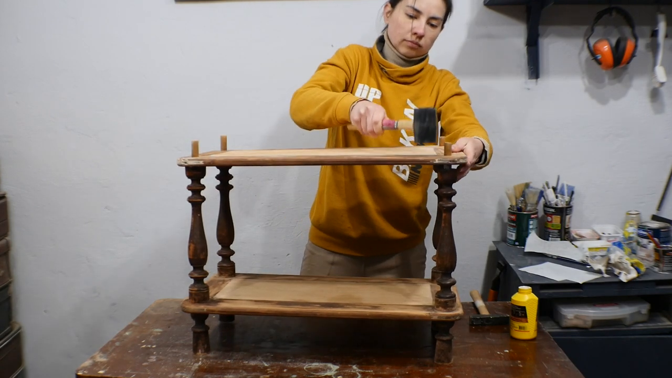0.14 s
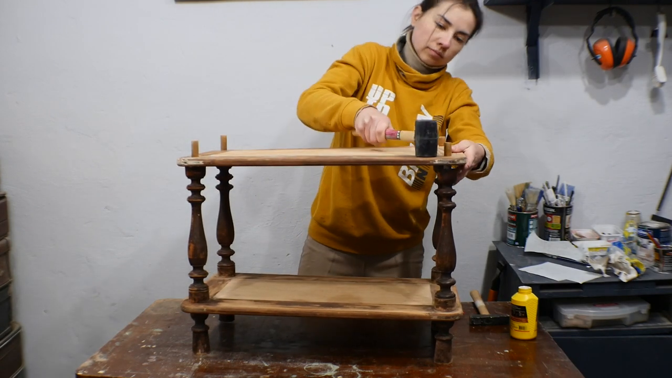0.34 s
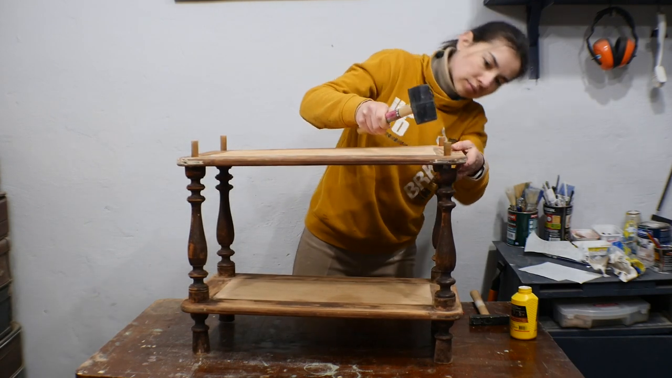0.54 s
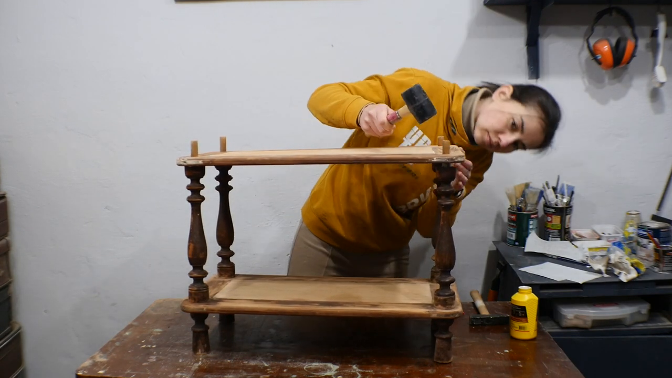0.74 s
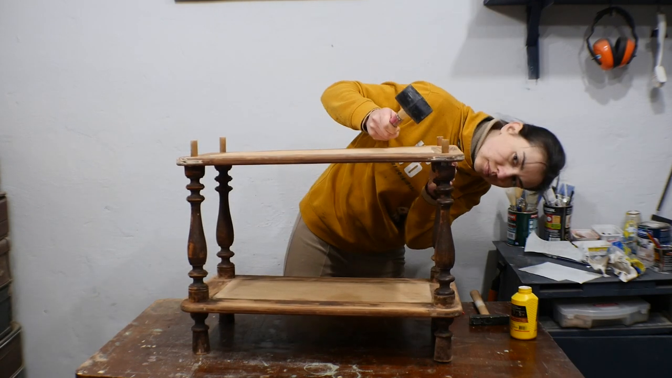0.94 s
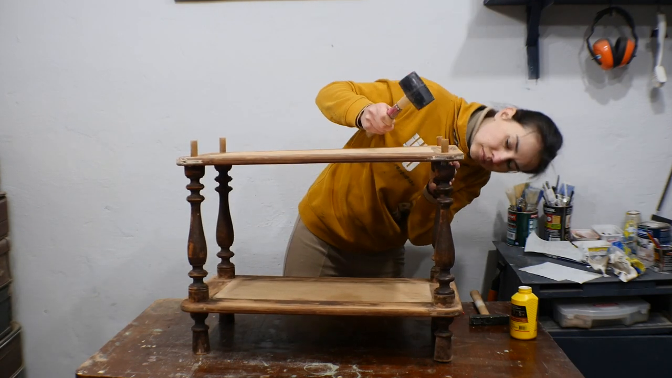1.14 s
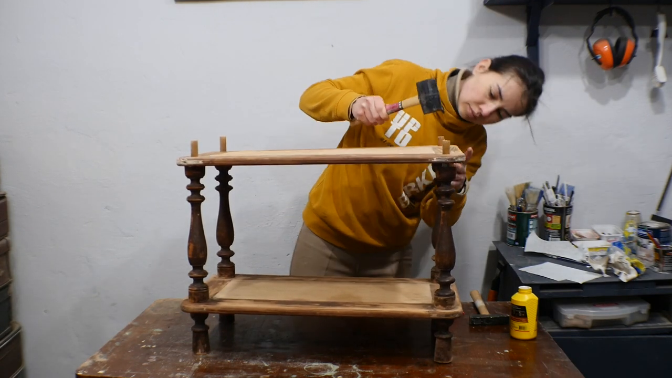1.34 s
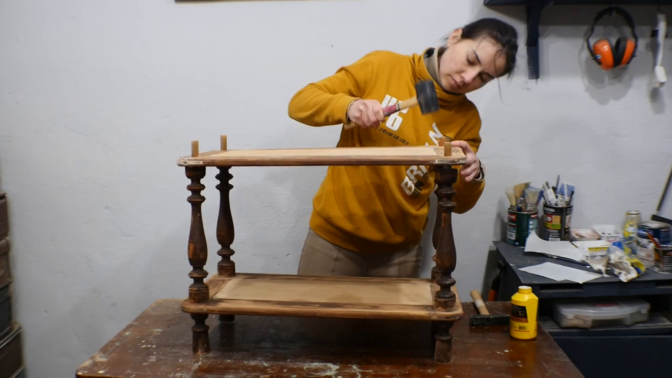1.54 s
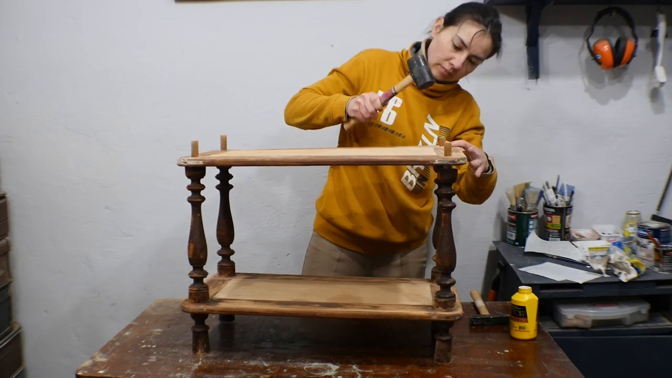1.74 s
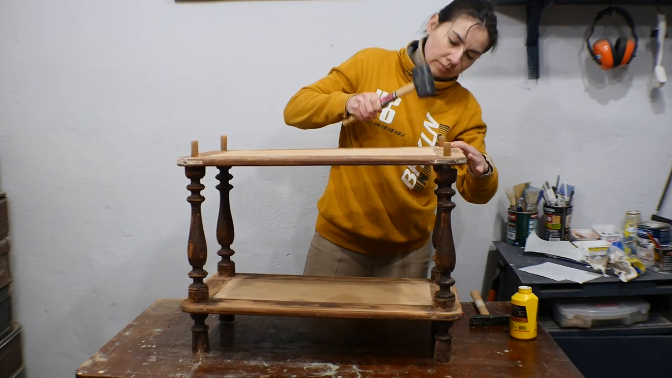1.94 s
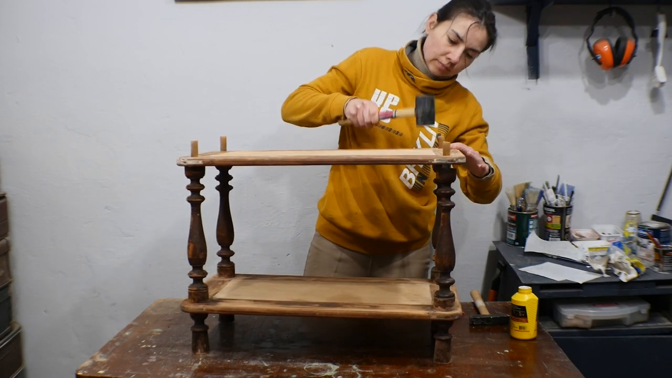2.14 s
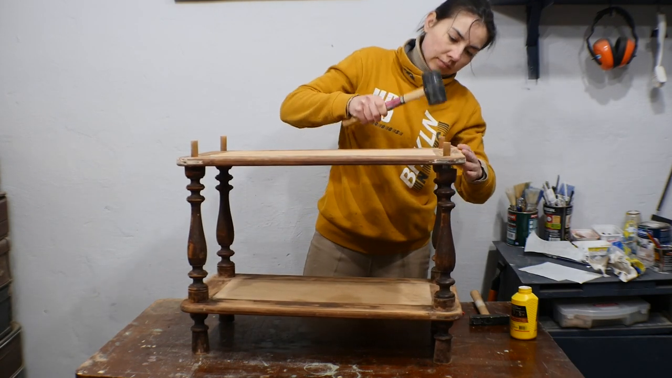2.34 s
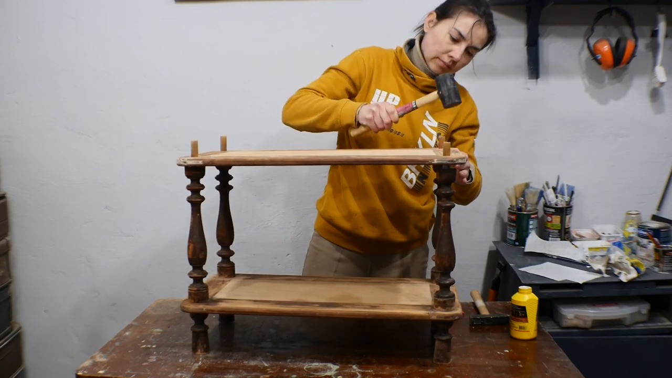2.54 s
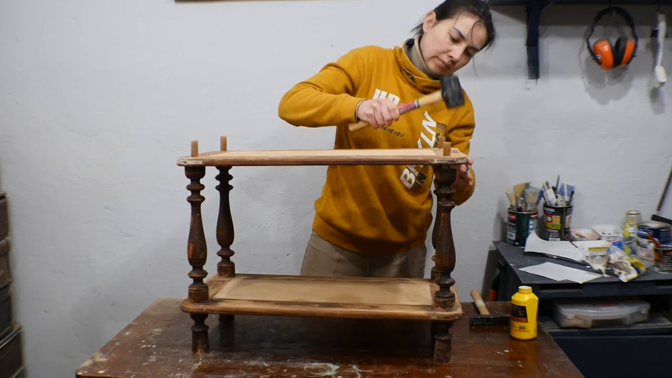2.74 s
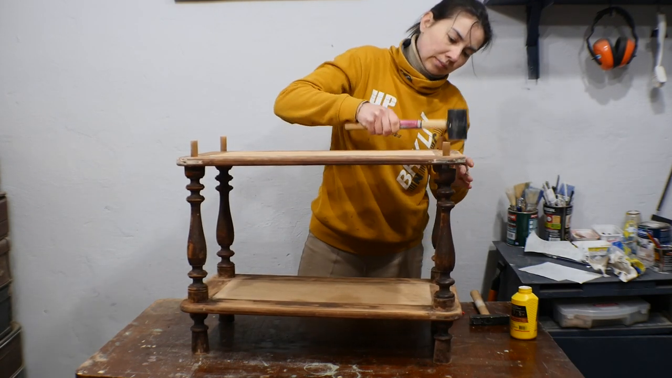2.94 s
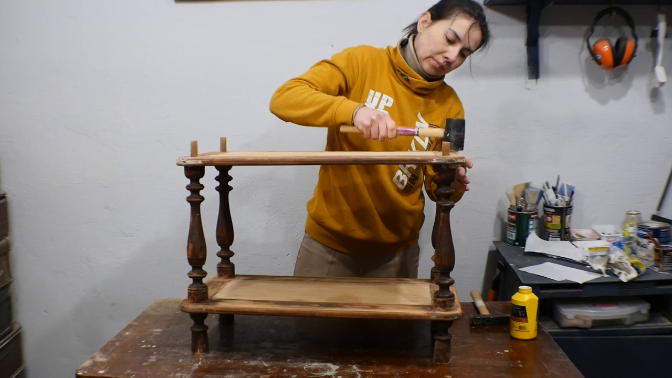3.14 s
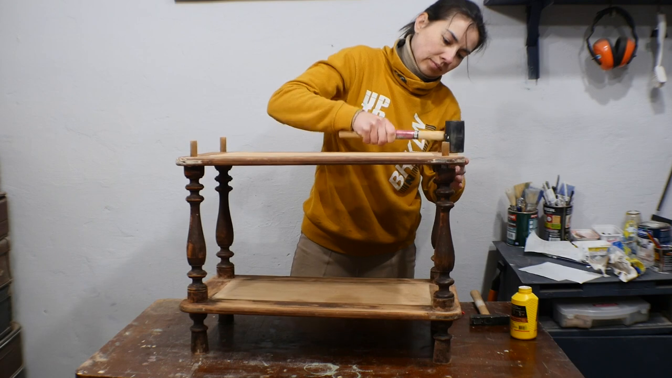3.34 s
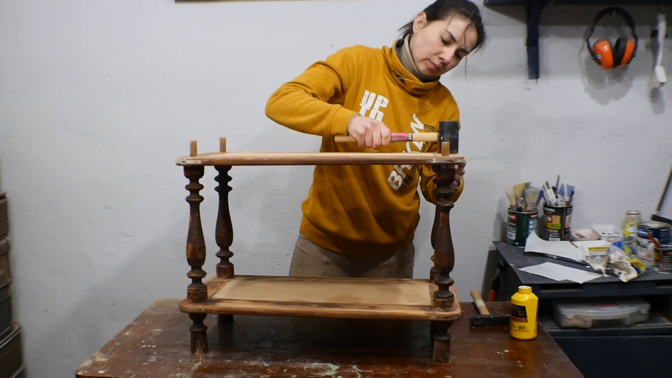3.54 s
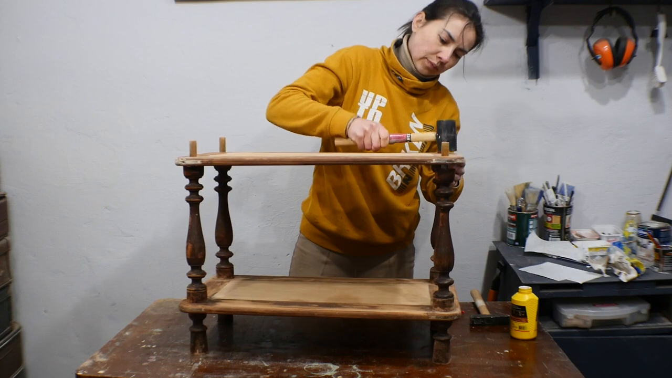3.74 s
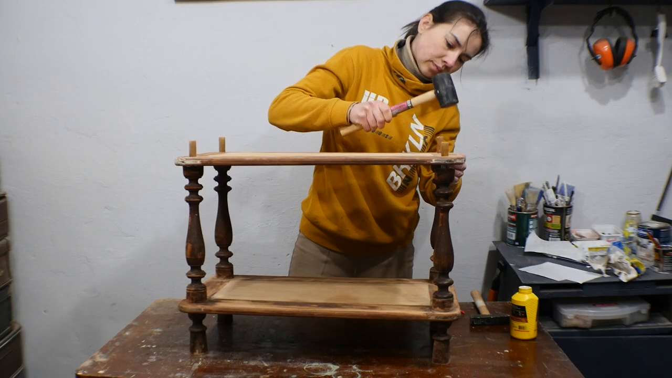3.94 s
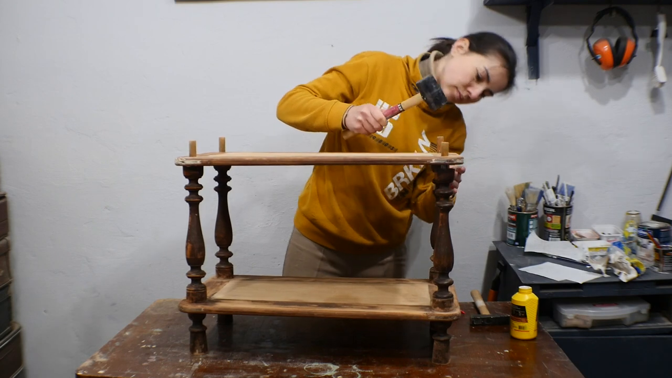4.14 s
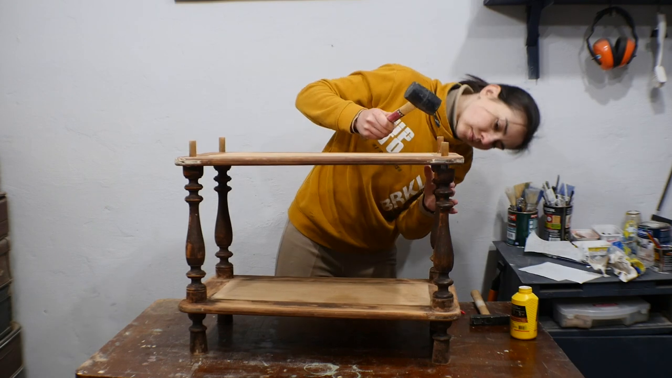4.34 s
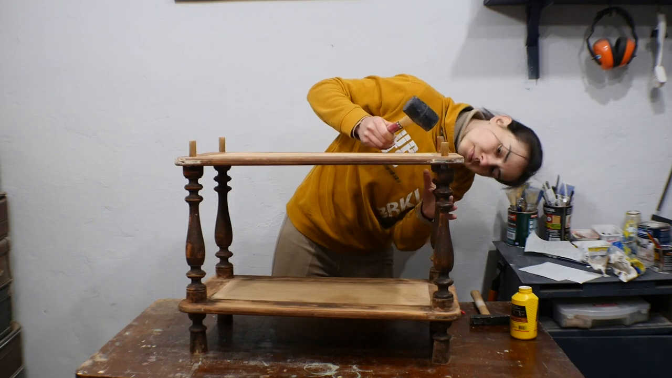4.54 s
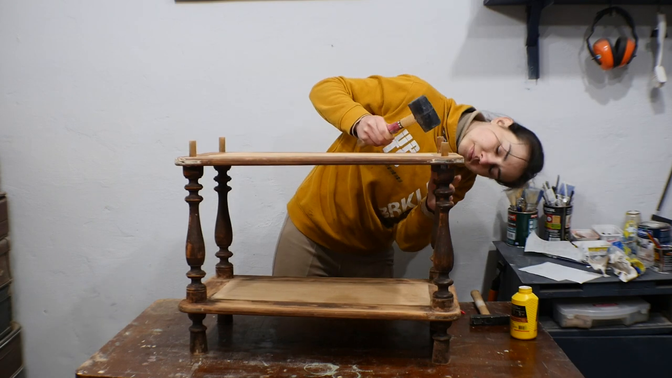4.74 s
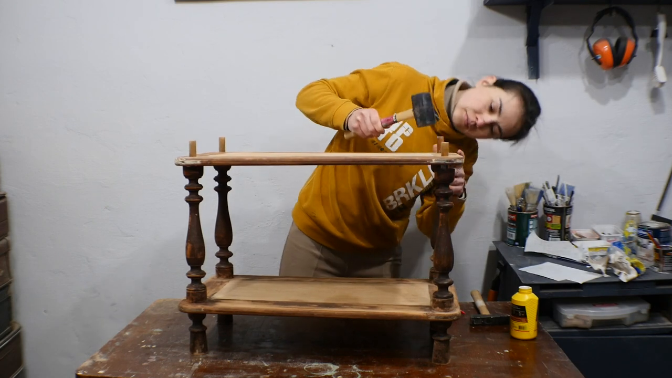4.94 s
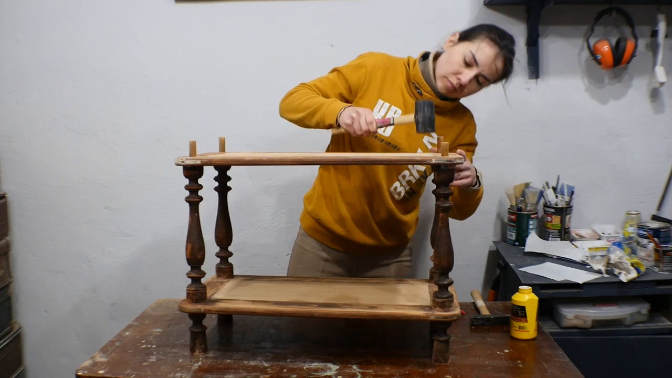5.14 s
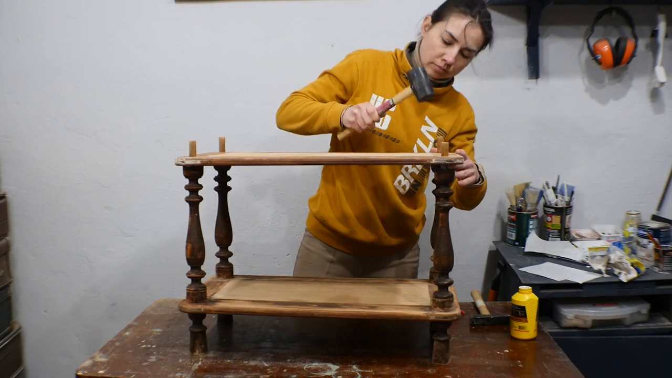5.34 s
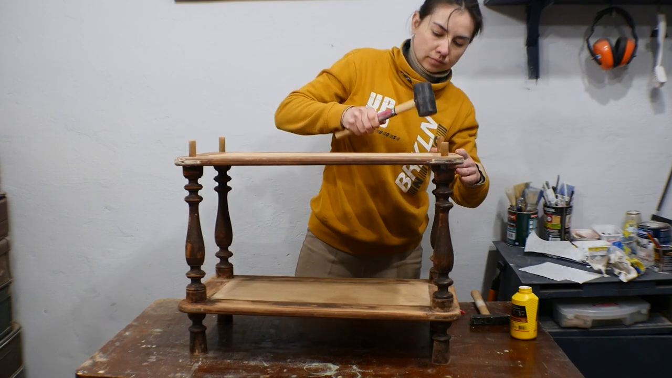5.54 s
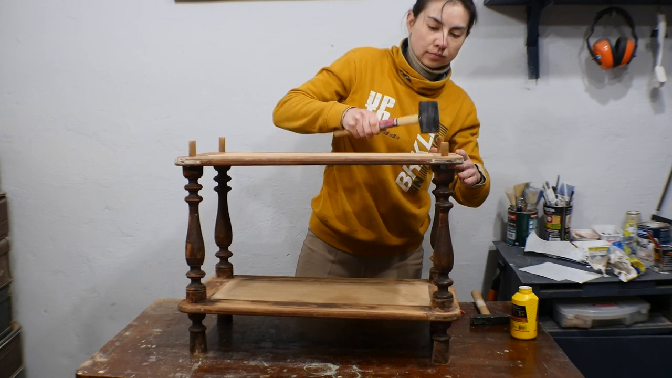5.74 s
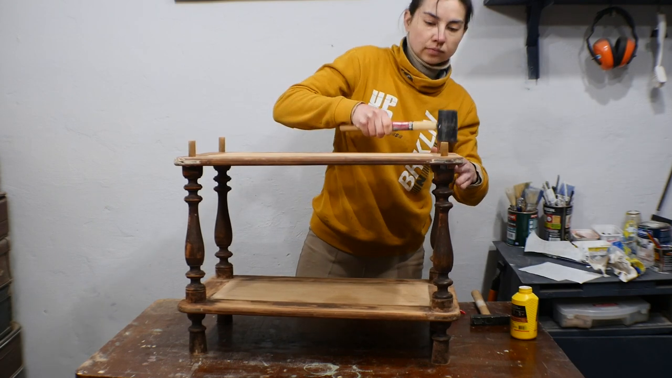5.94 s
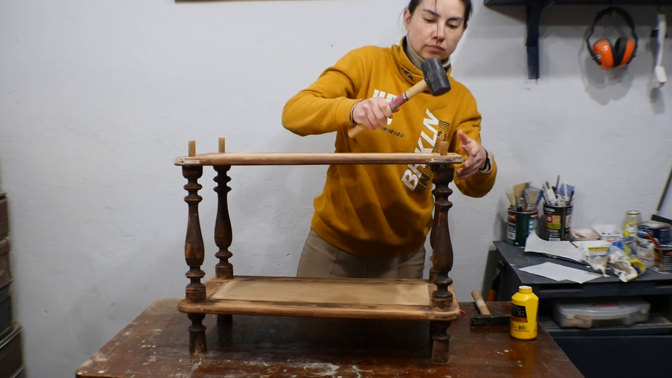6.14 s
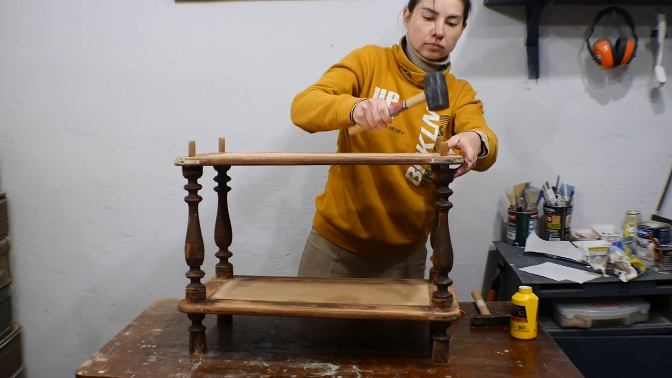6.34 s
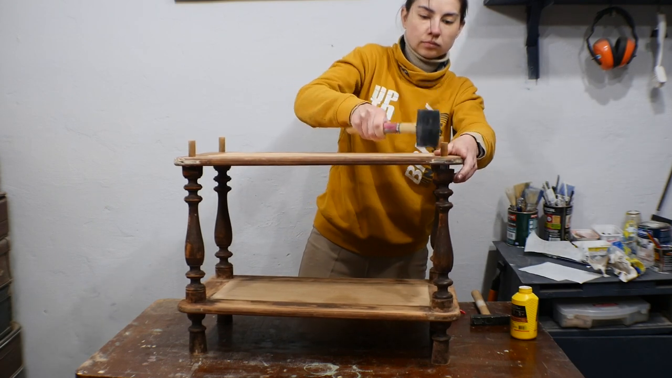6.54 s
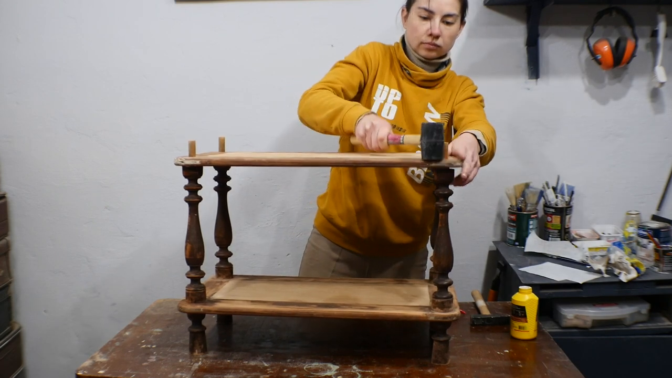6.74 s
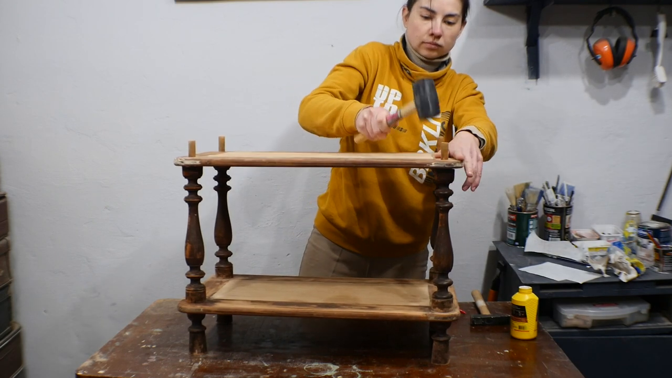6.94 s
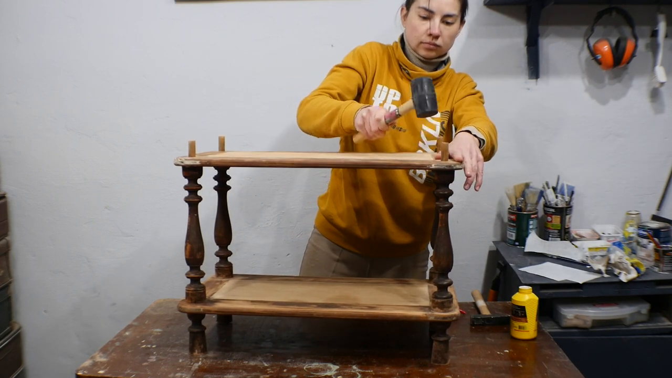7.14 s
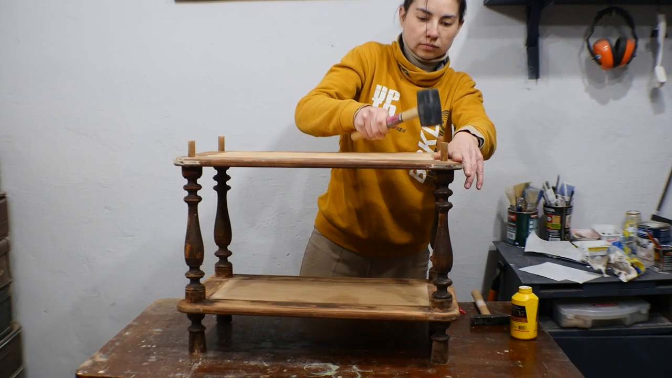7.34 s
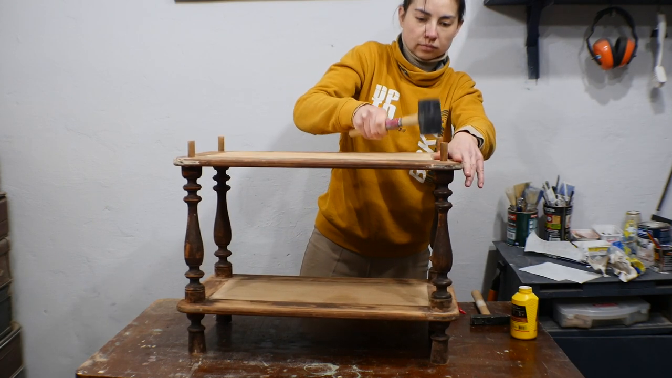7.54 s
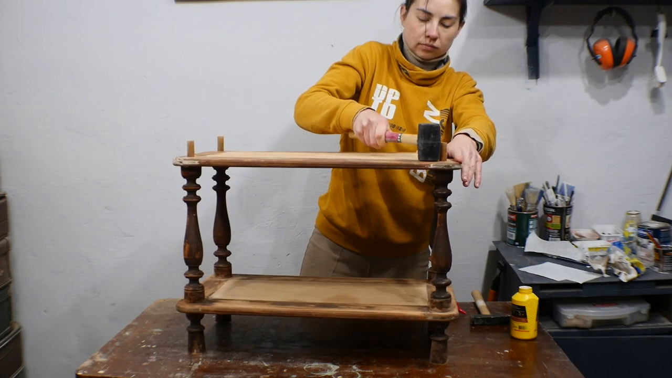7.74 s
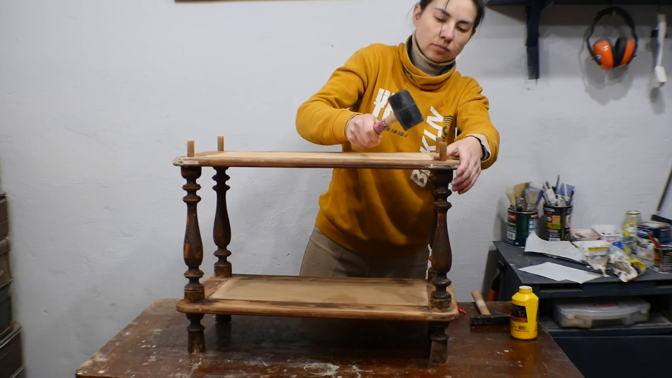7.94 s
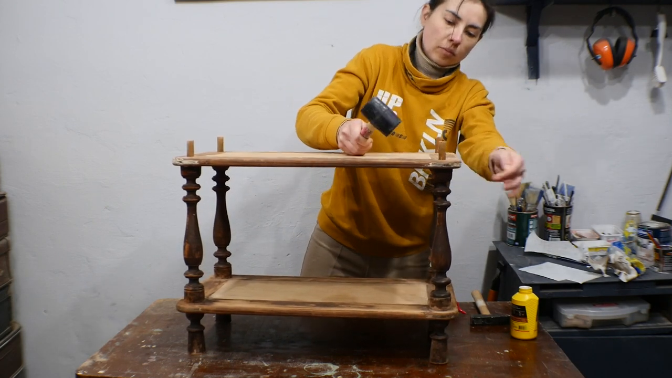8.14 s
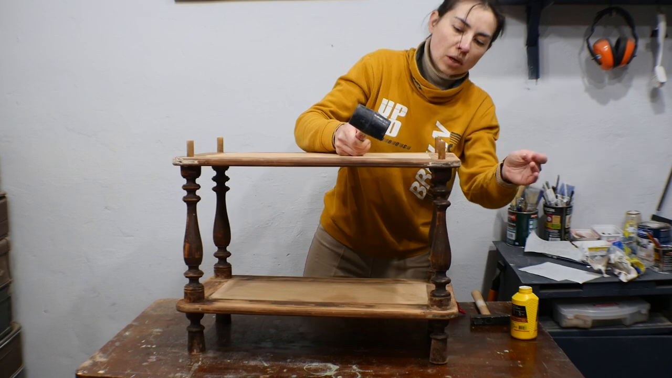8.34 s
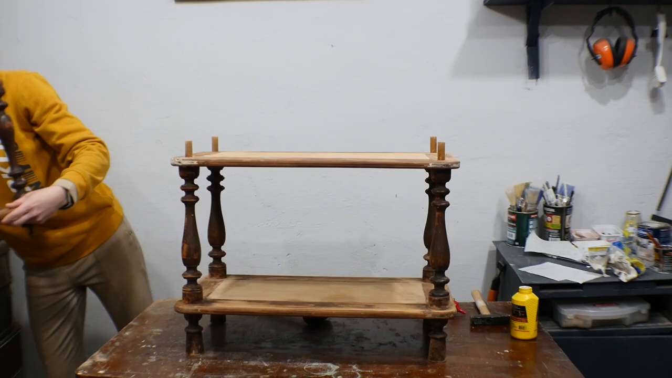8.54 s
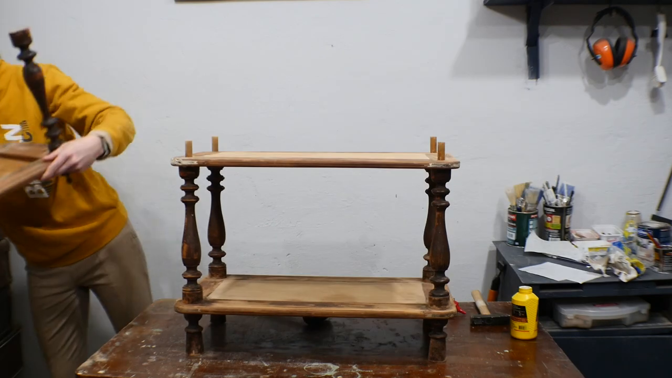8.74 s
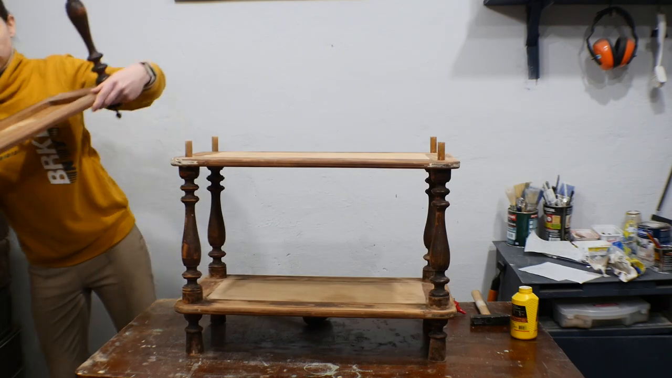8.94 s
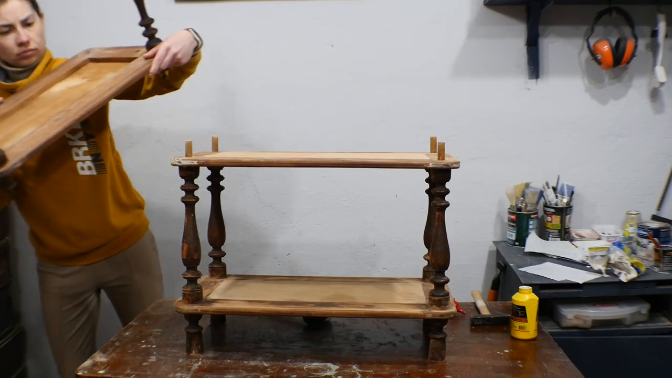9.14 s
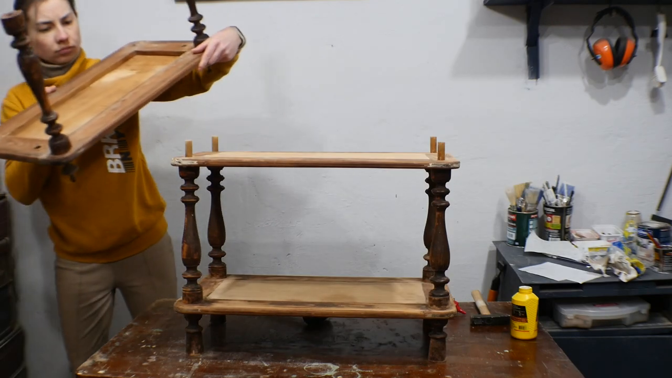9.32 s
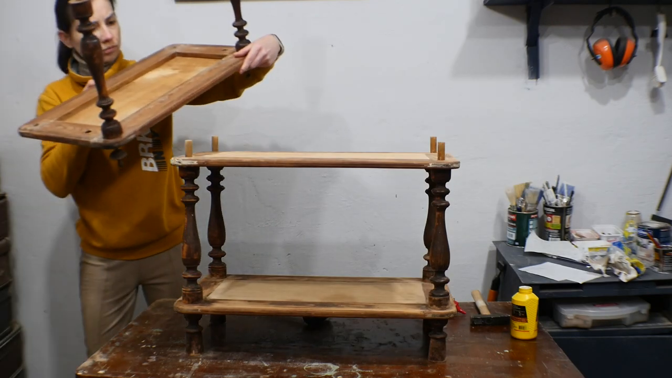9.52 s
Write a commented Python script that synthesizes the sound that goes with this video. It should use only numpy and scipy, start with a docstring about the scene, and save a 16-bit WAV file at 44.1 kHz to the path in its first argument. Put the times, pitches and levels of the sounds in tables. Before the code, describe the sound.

A rubber mallet knocks a wooden shelf down onto its spindles in short runs of quick blows, each a sharp crack with a hollow wooden ring. Between the early runs a loose board is tapped and briefly rattles. Near the end comes a dry click, then the background jumps to a louder hiss with shuffling wood, rustling cloth and soft bumps. The microphone is nearby in a bare, slightly reverberant workshop.

```python
"""A rubber mallet drives a wooden shelf down onto its spindles in short runs of blows, in a bare workshop.
Each impact cracks, knocks the joint and excites the damped modes of the wood; the room reverberates.
Between runs wood shuffles, cloth rustles, a tapped loose board rattles briefly, and there are soft
bumps and dry clicks. Near the end the background steps up abruptly to a louder, sustained hiss, with
shuffling and rustling over it. A limiter compresses the loud blows."""
import sys
import numpy as np
from scipy import signal
from scipy.fft import rfft, irfft
from scipy.io import wavfile
from scipy.ndimage import uniform_filter1d

SR = 44100
rng = np.random.default_rng(int(sys.argv[2]) if len(sys.argv) > 2 else 0)


def generate_wav(signal):
    """Clip the signal to [-1, 1] and save it as 16-bit WAV at the path in sys.argv[1]."""
    frames = np.transpose(np.atleast_2d(signal))
    scaled = np.clip(frames, -1, 1) * 32767
    pcm = np.round(scaled).astype(np.int16)
    wavfile.write(sys.argv[1], SR, pcm)


N = 426883
LEAD = SR // 5  # samples ahead of time zero, so that an earlier blow can ring into the scene


def gain_of(db):
    """Amplitude ratio: a factor of ten for every 20 dB."""
    return 10 ** (np.asarray(db) / 20)


def unit_rms(x):
    """Normalisation to a mean power of one."""
    return x / np.sqrt(np.mean(x ** 2) + 1e-20)


def curve_at(points, hz):
    """Interpolation of (frequency [Hz], value) points on a logarithmic frequency axis."""
    f, value = np.transpose(points)
    return np.interp(np.log(hz + 1), np.log(f + 1), value)


def add(mix, s, sound):
    """Superposition: a sound joins the mix at time s."""
    part = mix[..., LEAD + round(s * SR):][..., :sound.shape[-1]]
    part += sound[..., :part.shape[-1]]


def burst(spectrum, rise, t60, size=4096):
    """Exponential decay of coloured noise after a quick rise; both times in seconds."""
    t = np.arange(size) / SR
    gain = gain_of(curve_at(spectrum, np.fft.rfftfreq(size, 1 / SR)))
    noise = irfft(rfft(rng.standard_normal(size)) * gain)
    return unit_rms(noise) * (1 - np.exp(-t / rise)) * gain_of(-60 * t / t60)


def magnitude(spectrum, size=4096):
    """Two-sided magnitude response of a pulse of unit energy (Parseval's theorem)."""
    return unit_rms(gain_of(curve_at(spectrum, abs(np.fft.fftfreq(size, 1 / SR)))))


def pulse(gain):
    """Minimum phase gives the most compact causal click with this magnitude response."""
    return np.fft.ifft(np.exp(np.conj(signal.hilbert(np.log(gain))))).real


def diffuse_pair(mid, side, hz):
    """Spatial coherence: a diffuse field reaches two microphone ports most alike at long wavelengths."""
    # stereo width: (frequency [Hz], side minus mid level [dB])
    width = [(60, -17), (110, -32), (200, -37), (380, -21), (700, -7), (1290, 0.5), (2380, 1), (4400, 0),
             (8120, -2.5), (15000, -6)]
    side = side * gain_of(curve_at(width, hz))[:, None]
    return np.array([mid + side, mid - side])


def diffuse_noise(spectrum, patchy_db):
    """Random modulation: stereo noise of unit rms whose level drifts in patches of time and frequency."""
    frames, hz = N // 128 + 5, np.fft.rfftfreq(512, 1 / SR)
    mid_re, mid_im, side_re, side_im, patches = rng.standard_normal((frames, 257, 5)).T
    patches = unit_rms(uniform_filter1d(uniform_filter1d(patches, size=8, axis=0), size=16, axis=1))
    spectra = diffuse_pair(mid_re + 1j * mid_im, side_re + 1j * side_im, hz)
    spectra *= gain_of(curve_at(spectrum, hz)[:, None] + patchy_db * patches)
    return unit_rms(signal.istft(spectra, nperseg=512, noverlap=384)[1][:, :N])


def contact_db(hz, hard_db, thump_db):
    """Force spectrum of a contact: a short hard one favours high modes, a flat one moves the bench."""
    return hard_db * np.log2(hz / 500) + thump_db * np.exp(-np.log2(hz / 230) ** 2 / .5)


def impact(modes, crack_spectrum, knock_db, crack_db, db, hard_db, thump_db, tilt_db):
    """Impact excitation: modes ring, the joint knocks, the face cracks. Rows: direct sound, room feed."""
    # dull knock of the joint: (frequency [Hz], spectral level [dB])
    joint = [(60, -28.5), (120, -10), (220, 5), (400, 4), (700, 2), (1200, -1.5), (2000, -12),
             (3500, -25.5), (8000, -40.5)]
    rise_cycles, thud_hz, thud_peak_s = 2.2, 256, 0.0036
    t = np.arange(16384) / SR
    hz, mode_db, t60 = np.array(modes).T[:, :, None]
    spot = rng.standard_normal((len(modes), 2))  # each blow lands on a slightly different spot
    mode_db = mode_db + 2.0 * spot[:, :1] + contact_db(hz, hard_db, thump_db)
    envelopes = gain_of(mode_db - 60 * t / t60) * (1 - np.exp(-t * hz / rise_cycles))
    ring = (envelopes * np.sin(2 * np.pi * hz * (1 + 0.023 * spot[:, 1:]) * t)).sum(0)
    wood = gain_of([[-3.], [-8.]]) * ring
    knock = [(f, level + contact_db(f, hard_db, thump_db)) for f, level in joint]
    crack = [(f, level + tilt_db * np.log2(f / 5000)) for f, level in crack_spectrum]
    wood[0, :4096] += gain_of(knock_db + 11.) * burst(knock, rise=0.0031, t60=0.049)
    thud = (t / thud_peak_s * np.exp(1 - t / thud_peak_s)) ** 2  # first push of the whole bench
    wood[0] += gain_of(2 * thump_db - 0.4) * thud * np.sin(2 * np.pi * thud_hz * t)
    sound = gain_of(db) * wood
    sound[0, :4096] += gain_of(crack_db + 11.5) * burst(crack, rise=0.00066, t60=0.0054)
    room_knock = gain_of(db + knock_db + 29.5) * magnitude(knock)
    room_crack = gain_of(crack_db + 13.0) * magnitude(crack)
    sound[1, :4096] += pulse(np.hypot(room_knock, room_crack))  # incoherent, so their powers add
    return sound


def mallet_blows():
    """Free vibration of the shelf, struck at three spots in turn. Rows: direct sound, three room feeds."""
    # mallet strokes: (time [s], crack level [dB], wood level [dB], hardness [dB/octave],
    # deep thump [dB], crack tilt [dB/octave])
    blows = [(-.11, -21, -18.5, -2.9, -4.4, -3), (.1180, -9.5, -12.5, -1, -5.5, 2.5),
             (.3530, -17.5, -16, -1.5, -7, 0), (1.9011, -9, -12.5, -0.5, -5, 1.5),
             (2.1228, -10.5, -14.5, 0.8, -3.5, 1), (2.7246, -28.5, -22, -3.5, 3.5, 1),
             (2.9381, -7.5, -12.5, 1, 2.5, 0.8), (3.1620, -10.5, -15.5, 1, 3, -2.5),
             (3.3781, -16.5, -19.5, 1.1, 2.5, -2), (3.5869, -19.5, -21, -1.1, -0.5, -1.4),
             (3.8098, -16, -17, 2, 6, .2), (5.4932, -15, -12.5, -2.5, 1.5, 3),
             (5.6990, -22, -14, -1.1, 2.5, 0.5), (5.9190, -21.5, -16.5, 0.3, 6.5, -2.5),
             (6.558, -74, -54.5, -9, 2, -1), (6.8141, -15.5, -17.5, -0.7, -3.5, -0.3),
             (7.0545, -14.5, -17.5, -0.5, -5, -0.5), (7.2847, -20, -14, -1, -7, 0),
             (7.5055, -22.5, -13.5, -0.56, -3, 2.5), (7.7129, -22.5, -16.5, -0.65, -5, 0)]
    # modes of shelf and bench: (frequency [Hz], level [dB], t60 [s])
    shelf_modes = [(104.4, -17, 0.34), (153, -8.5, .2), (218.5, -3.5, 0.26), (252, -6.5, 0.095),
                   (300.7, 1.5, 0.2), (320, -6, 0.11), (425, -3, 0.11), (444.8, -7.5, 0.34),
                   (484.4, 2.5, 0.086), (557, 1.5, 0.15), (634, -1, 0.2), (693.6, 5, 0.057),
                   (813, -0.5, 0.0097), (935, -7.5, 0.065), (1029, -5.5, 0.061), (1273, -9.5, 0.13),
                   (1460, -9.5, 0.007), (1645, -1, 0.031), (1970, -19.5, 0.036), (2360, -19, .03)]
    # slap of the mallet face: (frequency [Hz], spectral level [dB])
    face_crack = [(1000, -2.5), (2000, 0.5), (4000, -1.5), (6500, -5), (10500, -5), (13000, -16),
                  (16000, -31), (19000, -39)]
    out = np.zeros((4, N + LEAD))
    for k, (s, *stroke) in enumerate(blows):
        direct, room_feed = impact(shelf_modes, face_crack, 0, *stroke)
        add(out[0], s, direct)
        add(out[1 + k % 3], s, room_feed)
    return out


def reverberation():
    """Absorption at the walls makes dense reflections of random sign die away, the treble soonest."""
    # reverberation time of the room: (frequency [Hz], t60 [s])
    walls = [(60, 0.61), (200, 0.61), (500, 0.51), (1200, 0.45), (3000, 0.44), (8000, 0.32), (15000, 0.26)]
    onset, spacing = 260, 8  # samples
    reflections = np.zeros((2, SR))
    slots = np.arange(onset, SR - spacing, spacing)
    at = slots + rng.integers(0, spacing, (2, len(slots)))
    np.put_along_axis(reflections, at, rng.choice([-1., 1.], at.shape), 1)
    hz, t, spectra = signal.stft(reflections, SR, nperseg=512)
    decay = gain_of(-60 * t / curve_at(walls, hz)[:, None])
    out = signal.istft(diffuse_pair(*spectra, hz) * decay, SR, nperseg=512)[1]
    return out[:, :SR] * (np.arange(SR) > onset) / np.linalg.norm(out[0])


def workshop(x):
    """Convolution with the room: early echoes for the direct sound, a separate tail for each room feed."""
    # reflections off bench, then walls: (delay [s], level [dB], lag of the left port [samples])
    echoes = [(.0027, -0.5, -0.5), (.0037, -5, 1.5), (.005, -4.5, 4.5), (.008, -7, 0), (0.013, -6, 9),
              (.019, -10, -5.5)]
    early = np.zeros((2, 2048))
    early[:, 0] = 1
    for s, db, lag in echoes:
        smear = np.hanning(3 + round(max(s - .004, 0) * 1200.))[1:-1]  # later echoes come back duller
        for port, at in enumerate((round(s * SR + lag), round(s * SR))):
            early[port, at:at + len(smear)] += gain_of(db) * smear / smear.sum()
    near = signal.oaconvolve(x[:1], early, axes=1)[:, LEAD:LEAD + N]
    tails = sum(signal.fftconvolve(feed[None], reverberation(), axes=1) for feed in x[1:])
    return near + gain_of(9.0) * tails[:, LEAD:LEAD + N]


def room_tone():
    """Background noise as a diffuse field: a faint, steady, low hush."""
    # hush of the room: (frequency [Hz], spectral level [dB])
    hush = [(18, -42), (30, -10.5), (138, -6.5), (245, 0), (280, -7), (384, -7.5), (1100, -15.5),
            (2750, -25), (8080, -31), (11700, -29), (16000, -66)]
    return gain_of(-67) * diffuse_noise(hush, patchy_db=0.88)


def stirring():
    """Friction noise of wood and cloth swells, holds and fades; near the end a sustained hiss sets in."""
    # shuffling wood, rustling cloth, and the loose board's brief rattle after its tap:
    # (time of full level [s], hold [s], shuffle level [dB], rustle level [dB])
    stirs = [(.9, .35, -66, -92), (1.51, 0.1, -61, -69), (1.68, 0.022, -34, -50),
             (4.65, 0.0088, -86.5, -78), (4.87, 0.019, -88, -78.5), (4.999, 0.19, -63, -72),
             (6.4, 0.055, -66.5, -99), (8.13, 0.033, -50.5, -60), (8.361, 0.011, -62, -75),
             (8.97, 0.0066, -49, -38.5), (9.04, 0.0085, -59, -41.5), (9.095, 0.036, -52, -34.5)]
    # the background steps up abruptly to a louder, sustained hiss, with shuffling and rustling over it:
    # (time [s], shuffle level [dB], rustle level [dB])
    raised_background = [(8.518, -40.5, -39), (8.6, -44.5, -44.5), (8.79, -41, -50.5), (8.92, -41, -44),
                         (9.01, -43, -51), (9.25, -44, -53), (9.5, -46, -56.5), (9.68, -46, -52.5)]
    # shuffling wood: (frequency [Hz], spectral level [dB])
    wood_shuffle = [(24, -90), (40, -63.5), (153, -5.5), (189, 1.5), (223, 8.5), (326, -17), (446, -0.5),
                    (495, -24), (611, -5.5), (6000, -35.5), (7800, -62.5), (13200, -120)]
    # rustling cloth: (frequency [Hz], spectral level [dB])
    cloth_rustle = [(1000, -7.5), (2500, 0.5), (3000, -4), (3600, 1), (4300, -1), (5000, -2), (5800, -2.5),
                    (6700, -2.5), (7800, -2), (10500, 1.5), (13000, -6), (16000, -16.5)]
    swell_db_per_s, fade_db_per_s = 448, np.array([[131.5], [187]])  # the rustle fades sooner
    t = np.arange(N) / SR
    times, *background_db = np.transpose(raised_background)
    levels = np.array([gain_of(np.interp(t, times, db, left=-200)) for db in background_db])
    for s, hold, shuffle_db, rustle_db in stirs:
        below_db = swell_db_per_s * np.maximum(s - t, 0) + fade_db_per_s * np.maximum(t - s - hold, 0)
        levels = np.hypot(levels, gain_of(np.array([[shuffle_db], [rustle_db]]) - below_db))
    wood_gain, cloth_gain = uniform_filter1d(levels, size=88)
    wood = wood_gain * diffuse_noise(wood_shuffle, patchy_db=0.82)
    return wood + cloth_gain * diffuse_noise(cloth_rustle, patchy_db=0.5)


def board_taps():
    """Free vibration of a loose board under light taps; its lowest modes ring longest."""
    # taps: (time [s], crack level [dB], wood level [dB], hardness [dB/octave],
    # deep thump [dB], crack tilt [dB/octave])
    taps = [(1.375, -58.5, -39.5, -.2, -9.5, .2), (1.6529, -42.5, -26.5, .82, -10, .3)]
    # modes of the board: (frequency [Hz], level [dB], t60 [s])
    board_modes = [(165, -5.5, 1), (337.4, 1.5, 0.47), (510, -15, 0.085), (668, 3, 0.17), (960, -1.5, 0.1),
                   (1180, 3, 0.032), (1437, 1, 0.04), (1780, -14.5, .06), (2100, -12.5, 0.03),
                   (2770, -31, 0.05)]
    # crack of a tap: (frequency [Hz], spectral level [dB])
    clack = [(1000, -6.5), (1700, 1.5), (2600, -5), (4000, -12), (7000, -16), (9500, -5), (12500, -9),
             (16000, -28)]
    out = np.zeros((4, N + LEAD))
    for s, *stroke in taps:
        add(out[:2], s, impact(board_modes, clack, -8.0, *stroke))
    return out


def soft_bumps():
    """A damped oscillator: each soft contact of hand and wood briefly rings a single mode."""
    # bumps: (time [s], level [dB], frequency [Hz], t60 [s])
    bumps = [(1.41, -38.5, 355.5, 0.12), (1.617, -56, 327, .1), (1.869, -25, 204, 0.043),
             (2.679, -48.5, 258, 0.071), (4.472, -61.5, 227, 0.11), (4.91, -73, 385, 0.13),
             (5.0, -59.5, 557, 0.093), (5.11, -69, 1960, .06), (5.14, -61.5, 630, 0.088),
             (8.15, -41.5, 450, 0.034), (8.31, -45.5, 256, 0.039), (8.911, -41, 397, 0.086),
             (9.05, -28.5, 230, 0.056), (9.068, -30.5, 215, 0.061)]
    rise_cycles = 0.79
    out, t = np.zeros((4, N + LEAD)), np.arange(16384) / SR
    for s, db, hz, t60 in bumps:
        envelope = gain_of(db - 60 * t / t60) * (1 - np.exp(-t * hz / rise_cycles))
        add(out[:2], s, gain_of([[2.5], [-5.]]) * envelope * np.sin(2 * np.pi * hz * t))
    return out


def dry_clicks():
    """Brief transients have broad spectra: small snaps with no ringing mode."""
    # clicks: (time [s], level [dB])
    ticks = [(2.58, -70.5), (5.105, -74), (8.3542, -28.5), (8.965, -54)]
    # their colour: (frequency [Hz], spectral level [dB])
    snap = [(1000, -15.5), (2500, -4), (5000, -12.5), (8000, 3.5), (13000, 2), (16500, -10.5)]
    out = np.zeros((4, N + LEAD))
    for s, db in ticks:
        direct = burst(snap, rise=0.00055, t60=0.0035)
        room_feed = gain_of(2.0) * pulse(magnitude(snap))
        add(out[:2], s, gain_of(db) * np.array([direct, room_feed]))
    return out


def scene():
    """Superposition of the impacts in the room, the friction noise and the room tone."""
    impacts = mallet_blows() + board_taps() + soft_bumps() + dry_clicks()
    return gain_of(4.0) * workshop(impacts) + stirring() + room_tone()


def record(dry):
    """Filtering and limiting: a microphone with weak bass and one narrow dip, a limiter, a band limit."""
    bass_cut_hz, dip_hz, edge_hz = 90., 7900, 16500
    threshold_db, release_db_per_s = -14.5, 60.0
    thin = signal.lfilter(*signal.butter(2, bass_cut_hz, "high", fs=SR), dry)
    heard = 0.29 * signal.lfilter(*signal.iirnotch(dip_hz, Q=12., fs=SR), thin) + 0.2 * thin
    power = uniform_filter1d((heard ** 2).max(0), size=30)
    level_db = 10 * np.log10(abs(power) + 1e-12)
    fall_db = np.arange(N) * release_db_per_s / SR
    held_db = np.maximum.accumulate(level_db + fall_db) - fall_db
    over_db = np.maximum(held_db - threshold_db, 0)
    limited = heard / gain_of(0.95 * uniform_filter1d(over_db, size=90, origin=-40))  # looks 2 ms ahead
    band_limit = signal.firwin(511, edge_hz, window=("kaiser", 9), fs=SR)
    return signal.oaconvolve(limited, band_limit[None], "same")


dry = scene()
out = record(dry)
generate_wav(out)
```